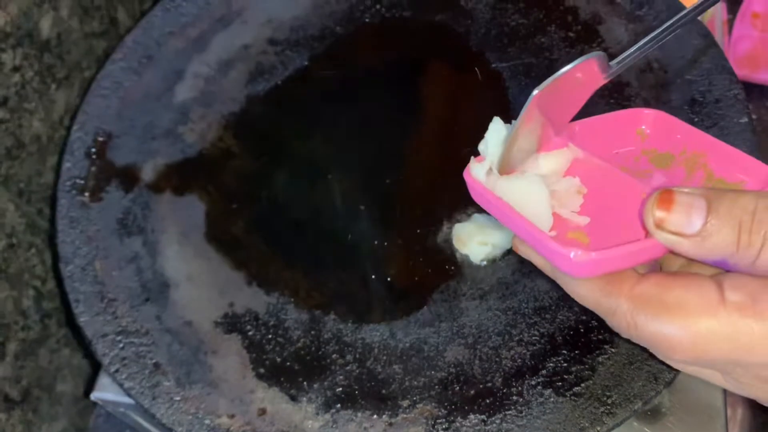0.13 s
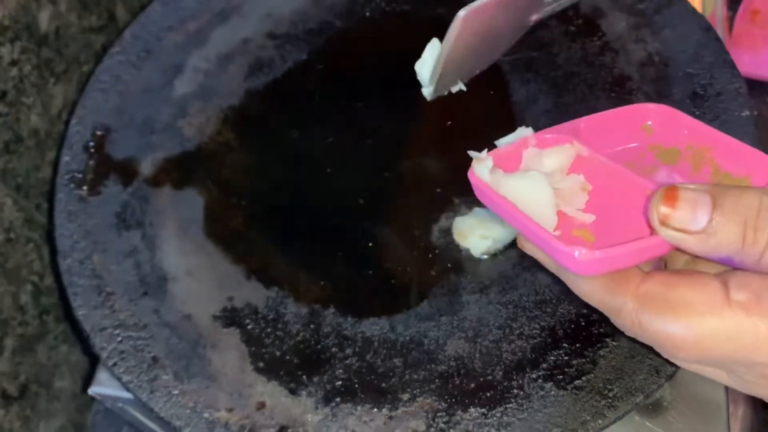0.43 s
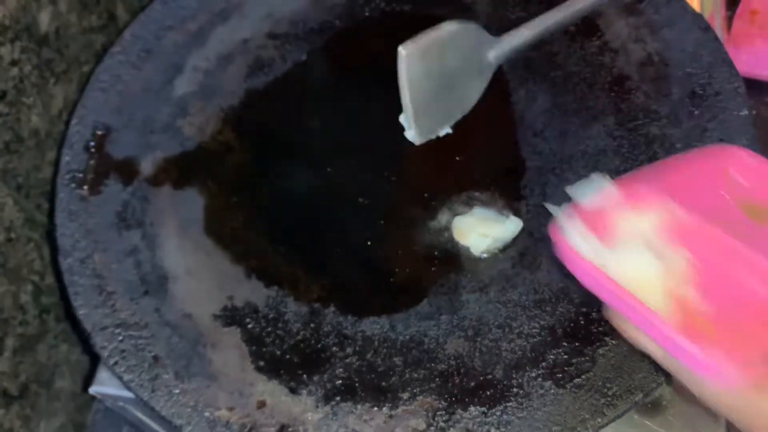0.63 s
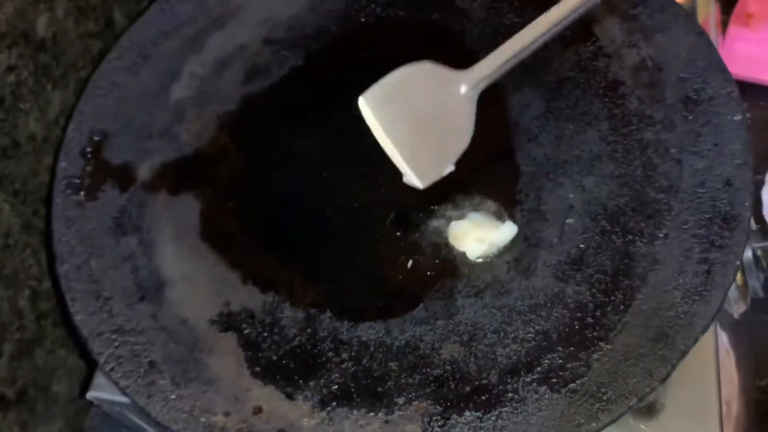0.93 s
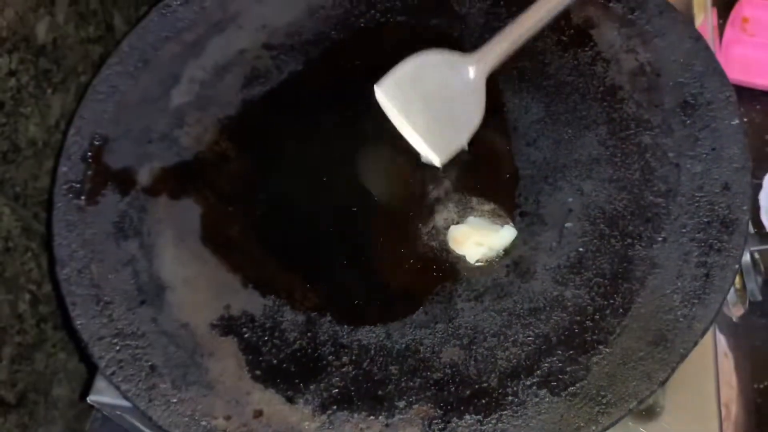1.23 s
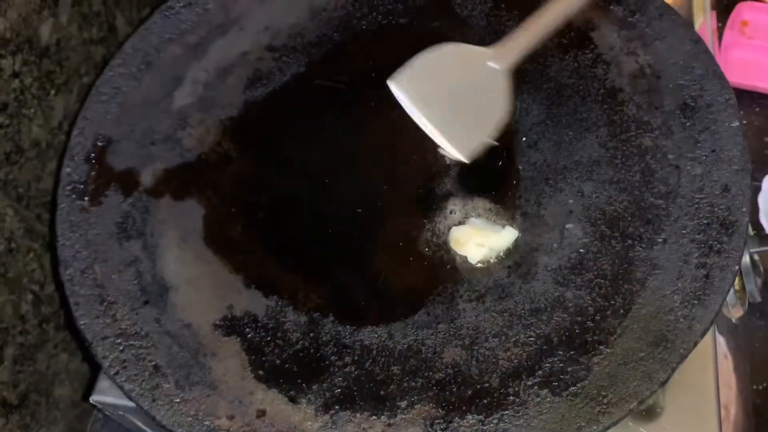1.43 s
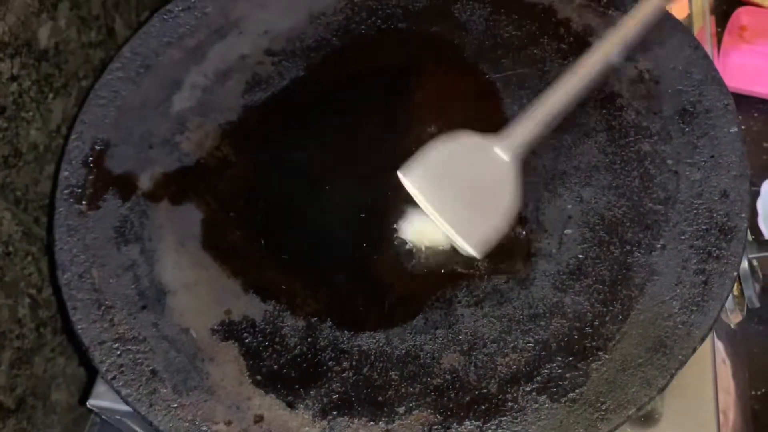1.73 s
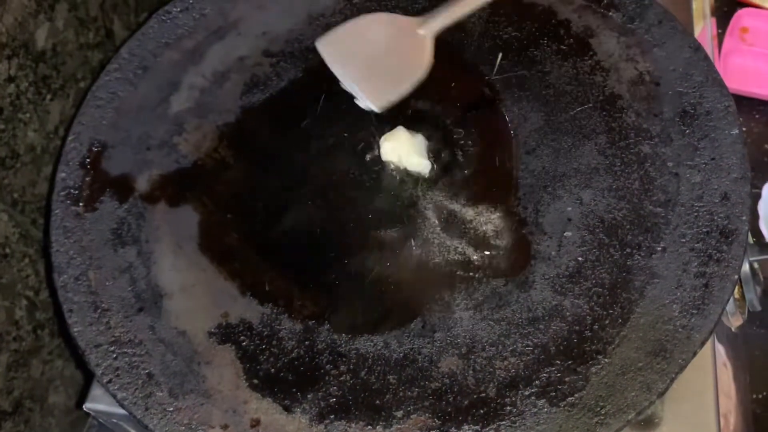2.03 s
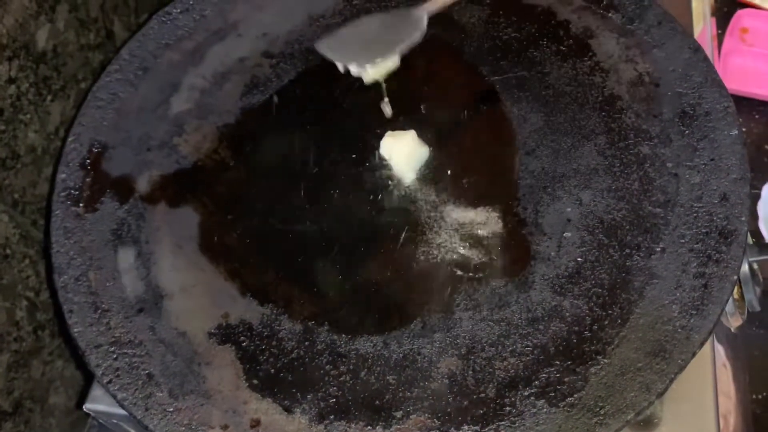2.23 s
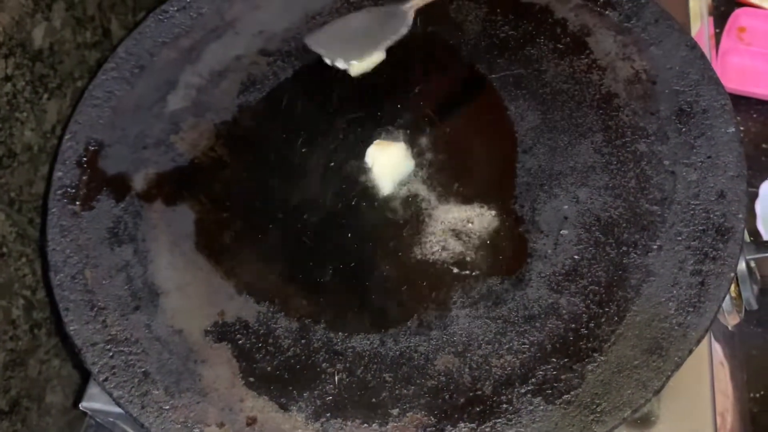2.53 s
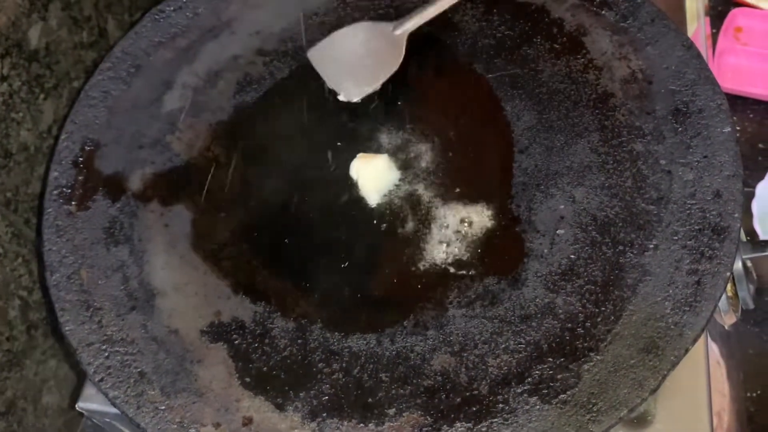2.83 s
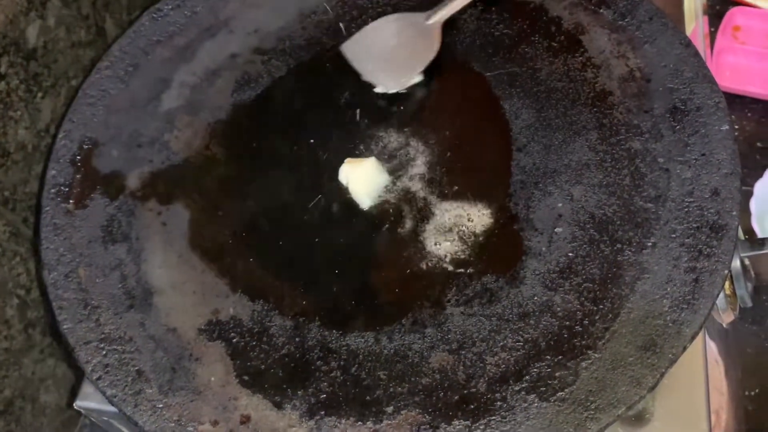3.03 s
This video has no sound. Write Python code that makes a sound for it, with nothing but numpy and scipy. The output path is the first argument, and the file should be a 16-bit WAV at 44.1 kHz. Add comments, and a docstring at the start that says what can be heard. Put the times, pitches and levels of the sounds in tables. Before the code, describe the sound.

Fat sizzles close to a stereo microphone in a kitchen, sparse crackling with bright pops at first, then a spatula knocks and scrapes the iron pan and the fizz grows denser over a faint burner roar.

```python
"""In a kitchen, a lump of fat sizzles in a hot iron pan over a gas flame, close under a two-port microphone.
The sizzle is made of many small bursts, each a short dying note, over a fine hiss of steam.
Large bubbles add short bright pops, trapped water spits with deeper notes, and droplets tick and snap.
A spatula then knocks and rubs the pan: the fat is smeared, the fizz thickens and the iron rings.
Under it lie the low noisy roar of the flame, a wavering hum and a short kitchen echo."""
import sys
import numpy as np
from scipy import signal
from scipy.fft import rfft, irfft
from scipy.io import wavfile
from scipy.ndimage import uniform_filter1d

SR = 44100
rng = np.random.default_rng(int(sys.argv[2]) if len(sys.argv) > 2 else 0)


def output_pcm(signal):
    """Save a mono or channel-first signal as 16-bit PCM at the path in sys.argv[1].

    Samples are clipped to [-1, 1] before scaling.
    """
    pcm = np.clip(np.atleast_2d(signal).T, -1, 1) * 32767
    wavfile.write(sys.argv[1], SR, np.round(pcm).astype(np.int16))


def convert_level_to_amplitude(level_db):
    """Map a level in decibels to its linear amplitude factor."""
    exponent = np.asarray(level_db, float) / 20
    return 10 ** exponent


N = 140238  # length in samples
HZ = np.fft.rfftfreq(N, 1 / SR)
BIGGEST = 2.6  # upper limit of the random draw that sets a bubble's or droplet's size

# how loud the lump of fat sizzles: (time [s], level [dB])
LUMP_LEVEL = [(0.0, -35), (0.12, -35.5), (0.4, -29), (0.75, -36), (1.06, -31), (1.3, -30), (1.7, -33.5),
              (1.82, -30.5), (2.05, -25.5), (2.4, -36.5), (2.94, -33), (3.18, -53)]
# how loud the smeared film of fat sizzles: (time [s], level [dB])
FILM_LEVEL = [(0, -41.5), (1.0, -43.5), (1.5, -36), (1.72, -40.5), (1.9, -32), (2.06, -29), (2.2, -28.5),
              (2.28, -25), (2.38, -26.5), (2.46, -24), (2.6, -25.5), (2.78, -24), (2.85, -27), (3.18, -23)]


def evened(x):
    """Scales a sound to rms 1."""
    return x / np.sqrt(np.mean(x ** 2) + 1e-20)


def read(points, hz):
    """Reads a table between its points, on a log-frequency axis."""
    f, value = np.transpose(points)
    return np.interp(np.log(hz + 1), np.log(f + 1), value)


def curve(points):
    """Turns a level table into a gain for every sample."""
    s, db = np.transpose(points)
    return convert_level_to_amplitude(np.interp(np.arange(N) / SR, s, db))


def coloured(x, tone):
    """Filters x with a tone table, then scales it to rms 1."""
    return evened(irfft(rfft(x) * convert_level_to_amplitude(read(tone, HZ)), N))


def ring(hz, t60, size=1500, glide=0., rise_s=.0001):
    """A dying sine with a soft start; glide raises its pitch early on."""
    t = np.arange(size) / SR
    shape = (1 - np.exp(-t / rise_s)) ** 2 * convert_level_to_amplitude(-60 * t / t60)
    return shape * np.sin(2 * np.pi * hz * t * (1 + glide * np.minimum(t / t60, 1)))


def burst(noise, lo_hz, hi_hz, t60, rise_s):
    """A dying puff of noise, filtered to a band, peak 1."""
    t = np.arange(len(noise)) / SR
    puff = noise * (1 - np.exp(-t / rise_s)) * convert_level_to_amplitude(-60 * t / t60)
    band = signal.butter(2, [lo_hz, hi_hz], "band", fs=SR, output="sos")
    x = signal.sosfilt(band, puff)
    return x / abs(x).max()


def add(mix, s, sound):
    """Mixes a sound in at time s."""
    part = mix[round(s * SR):][:len(sound)]
    part += sound[:len(part)]


def sizzle(level, tone, per_s, spread_db, clump_db, hiss_db, count=32):
    """Clumped bursts of small bubbles of many pitches over a fine steam hiss."""
    # slow random swings make the bursts come in clumps
    swing = uniform_filter1d(uniform_filter1d(rng.standard_normal(N), 500), 300)
    clumps = convert_level_to_amplitude(clump_db * evened(swing))
    size = convert_level_to_amplitude(spread_db * np.minimum(rng.exponential(1, N), BIGGEST))
    size *= rng.choice([-1., 1.], N)
    size *= rng.random(N) < clumps * per_s / SR
    kind = rng.integers(0, count, N)
    fizz = np.zeros(N)
    for k, (a, b) in enumerate(rng.random((count, 2))):
        hz = 1100 + 15000 * (k + a) / count
        # higher notes tend to die sooner
        t60 = (0.51 + b * (46.3 - 0.51)) / (40 * np.sqrt(hz))
        grain = ring(hz, t60, size=600, glide=0.086, rise_s=0.000083)
        fizz += signal.oaconvolve(size * (kind == k), grain / np.linalg.norm(grain))[:N]
    hiss = convert_level_to_amplitude(hiss_db) * np.sqrt(clumps) * rng.standard_normal(N)
    return curve(level) * coloured(evened(fizz) + hiss, tone)


def lump_sizzle():
    """Sparse, uneven bubbling of the lump of fat."""
    # colour of the lump's sizzle: (frequency [Hz], relative level [dB per Hz])
    lump_tone = [(200, -48), (1000, -30), (1500, -25), (2400, -46), (3800, -17.5), (5400, 3.5), (6000, -8),
                 (6600, -4.5), (8000, -4), (11000, -4.5), (14000, -9), (16000, -6.5)]
    return sizzle(LUMP_LEVEL, lump_tone, per_s=334, spread_db=3, clump_db=5.5, hiss_db=-6)


def film_sizzle():
    """Dense, hissing fizz of the smeared film of fat."""
    # colour of the film's sizzle: (frequency [Hz], relative level [dB per Hz])
    film_tone = [(200, -36), (1000, -18.5), (1300, -15), (2000, -15.5), (3500, -1.5), (4800, 7),
                 (5800, 6.5), (7000, 0.5), (11000, -1.5), (16000, -10.5)]
    return sizzle(FILM_LEVEL, film_tone, per_s=1504, spread_db=6, clump_db=4, hiss_db=2)


def pops():
    """A large bubble bursts: ringing cavity, bright crack, lower snap, an echo from the pan wall, then froth."""
    # big bright pops: (time before a short fixed delay [s], relative level [dB], pitch [Hz],
    # level of the lower snap before snap_cut_db [dB])
    pop_list = [(0.0235, -21, 10600, 5), (0.062, -20.5, 7200, 4), (0.1576, -15, 8900, -24),
                (0.258, -16, 6970, -31), (0.3066, -18.5, 6460, -36), (0.351, -13.5, 6100, -40),
                (0.459, -25, 7950, -19), (0.5432, -21, 6560, -39), (0.589, -17, 6070, -40),
                (0.8023, -14, 5460, -34), (0.839, -17.5, 6100, -28), (0.8715, -21, 6640, 6.5),
                (0.9775, -18, 6300, -35), (1.019, -20, 6400, -28), (1.0373, -19, 6300, -18),
                (1.053, -9.5, 6500, -47), (1.1054, -18, 6550, -40), (1.1894, -10.5, 8900, -23),
                (1.2138, -7, 6950, -46), (1.285, -13.5, 6700, -27), (1.3138, -8, 6800, -56),
                (1.373, -13, 5800, -28), (1.402, -14.5, 6540, -6), (1.446, -36, 8050, -22),
                (1.4626, -17, 11600, -29), (1.6448, -13.5, 5800, -24), (1.6573, -6.5, 6050, -49),
                (1.731, -19, 6960, -30), (1.77, -22, 10900, -33), (1.822, -21, 6100, -20),
                (1.8356, -16.5, 11500, -18), (1.878, -25, 10900, -22), (1.894, -26, 8200, -29),
                (2.2741, -10, 6890, 8), (2.3922, -18, 6520, -3), (2.4876, -15, 7200, 7),
                (2.597, -11, 6000, -33), (2.694, -14, 7800, -24), (2.7534, -13.5, 6300, 10),
                (2.914, -27, 7660, -29), (2.9653, -16, 6400, -28), (3.045, -15, 6400, 1),
                (3.1395, -24.5, 6300, 17.5)]
    delay_s, snap_cut_db = 0.0021, -10
    echo_s, echo_db, froth_db, froth_t60 = 0.0014, -19.5, -9.5, 0.11
    out = np.zeros(N)
    for (s, db, hz, snap_db), z in zip(pop_list, rng.standard_normal((len(pop_list), 3, 1600))):
        start = s + delay_s
        cavity = ring(hz, t60=0.0039, size=1600, glide=0.011, rise_s=0.000086)
        crack = burst(z[0], 4500, 14300, t60=0.0012, rise_s=.00005)
        snap = burst(z[1], 1610, 5400, t60=0.0075, rise_s=.0001)
        froth = burst(z[2], 0.8 * hz, min(1.16 * hz, 16000), froth_t60, rise_s=0.00012)
        pop = convert_level_to_amplitude(db) * (2.3 * cavity + 0.7 * crack + convert_level_to_amplitude(snap_db + snap_cut_db) * snap)
        add(out, start, pop + convert_level_to_amplitude(db + froth_db) * froth)
        # the echo delay varies a little from pop to pop
        add(out, start + echo_s * (1 + 0.27 * np.tanh(z[0, 0])), convert_level_to_amplitude(echo_db) * pop)
    return out


def spits():
    """Water trapped under the fat bursts with a deeper note and a crack; the rings near 2 kHz at 1.785 s and
    2.244 s are the spatula clinking as it knocks the pan."""
    # deep spits, plus the spatula's clinks at 1.785 s and 2.244 s: (time before a short fixed delay [s],
    # relative level [dB], pitch [Hz], ring t60 [s])
    spit_list = [(0.162, -31.5, 1680, 0.0057), (0.423, -21, 4570, 0.0084), (0.7188, -15.5, 3820, 0.0054),
                 (0.8695, -18, 4240, 0.0061), (1.189, -12, 4410, 0.018), (1.261, -21.5, 4400, 0.013),
                 (1.3156, -28, 4180, 0.0054), (1.434, -19, 3720, 0.0014), (1.462, -25, 3760, 0.0031),
                 (1.5113, -18, 2950, 0.0028), (1.5358, -15.5, 4360, 0.018), (1.603, -18.5, 4100, 0.0077),
                 (1.7438, -18, 4400, 0.017), (1.7725, -20, 3630, 0.0056), (1.7853, -17, 2130, 0.018),
                 (1.8309, -18, 3650, 0.0076), (1.8331, -8.5, 3870, 0.0049), (1.8419, -17, 4200, 0.018),
                 (1.9205, -18, 2920, 0.0022), (2.0355, -23.5, 1830, 0.0064), (2.0656, -17, 4480, 0.0047),
                 (2.16, -9, 3430, 0.0047), (2.2437, -12, 1995, 0.029), (2.2713, -20, 1990, 0.045),
                 (2.2762, -7.5, 3680, 0.01), (2.2802, -13, 2200, 0.004), (2.2976, -25, 2110, 0.006),
                 (2.3301, -6.5, 2180, 0.003), (2.3374, -20, 1990, 0.0048), (2.4194, -6, 2240, 0.0052),
                 (2.438, -16, 2040, 0.0077), (2.4563, -8, 2330, 0.0043), (2.4657, -11, 2340, 0.0047),
                 (2.5276, -19.5, 2090, 0.0075), (2.644, -9.5, 3840, 0.0092), (2.702, -14, 3780, 0.0046),
                 (2.7488, -16, 3040, 0.0036), (2.868, -21, 3960, 0.014), (2.8866, -18.5, 3620, 0.0094),
                 (2.9393, -17.5, 3740, 0.013), (3.0224, -15.5, 3080, 0.0059), (3.051, -11.5, 3470, 0.0051),
                 (3.1097, -20.5, 1980, 0.0079)]
    delay_s, crack_db = 0.0021, -5
    out = np.zeros(N)
    for (s, db, hz, t60), z in zip(spit_list, rng.standard_normal((len(spit_list), 1500))):
        note = ring(hz, max(t60, .001), glide=0.0087, rise_s=0.000097)
        crack = burst(z, 1100, 7950, t60=0.0021, rise_s=.0001)
        add(out, s + delay_s, convert_level_to_amplitude(db) * (note + convert_level_to_amplitude(crack_db) * crack))
    return out


def snaps():
    """A droplet explodes on bare iron: a needle click and a dry bright crack, with a weaker low edge."""
    # hard snaps: (time [s], relative level [dB])
    snap_list = [(0.023, -4.5), (0.324, -15), (0.425, -7), (0.5425, -9.5), (.59, -16), (.603, -10),
                 (.648, -8), (0.872, 1), (0.884, -11), (1.064, -12), (1.189, -10), (1.2917, -8),
                 (1.4638, -2.5), (1.8967, -6), (2.0052, -12), (2.0144, -1.5), (2.0482, -6), (2.0535, -4),
                 (2.071, 0), (2.083, -10), (2.093, -12), (2.0968, -8), (2.1043, -2), (2.107, -6),
                 (2.6485, -18), (2.788, -6), (2.821, -6), (2.967, 1), (2.984, -4)]
    t60 = 0.0036
    out = np.zeros(N)
    for (s, db), z in zip(snap_list, rng.standard_normal((len(snap_list), 2, 400))):
        needle = z + 9 * (np.arange(400) == 8)  # one tall sample stands out of the noise
        crack = burst(needle[0], 6800, 15300, t60, rise_s=.0001)
        low_edge = burst(needle[1], 810, 6400, t60, rise_s=.0001)
        add(out, s, convert_level_to_amplitude(db) * (crack + 0.063 * low_edge))
    return out


def ticks():
    """Tiny droplets snap over a wide band, more loudly as the sizzle grows."""
    # colour of the ticks: (frequency [Hz], relative level [dB per Hz])
    tick_tone = [(300, -32), (900, -18), (1500, -2.5), (4000, -22), (8000, 11.5), (16000, -1.5)]
    per_s, spread_db, under_sizzle_db = 90, -0.5, -10
    size = convert_level_to_amplitude(spread_db * np.minimum(rng.exponential(1, N), BIGGEST))
    size *= rng.random(N) < per_s / SR
    shapes = np.exp(-np.arange(200) / 22) * rng.standard_normal((4, 200))
    kind = rng.integers(0, len(shapes), N)
    train = sum(signal.oaconvolve(size * (kind == k), one)[:N] for k, one in enumerate(shapes))
    loudness = uniform_filter1d(curve(LUMP_LEVEL) + curve(FILM_LEVEL), 8000)
    return convert_level_to_amplitude(under_sizzle_db) * loudness * coloured(train, tick_tone)


def scrape():
    """The spatula rubs the iron: very dense small bursts, made the same way as the sizzle."""
    # how loud the spatula rubs: (time [s], level [dB])
    scrape_level = [(1.76, -93), (1.785, -42), (1.85, -58), (1.9, -75), (2.235, -55), (2.25, -36),
                    (2.3, -36.5), (2.345, -38), (2.37, -39), (2.415, -69), (2.43, -30), (2.48, -46),
                    (2.55, -44), (2.65, -75)]
    # colour of the rubbing: (frequency [Hz], relative level [dB per Hz])
    scrape_tone = [(200, -34), (600, -4), (1100, -11), (2000, -6.5), (3200, -5.5), (4500, -10), (7000, -55),
                   (16000, -50)]
    return sizzle(scrape_level, scrape_tone, per_s=5006, spread_db=2, clump_db=4.5, hiss_db=-8)


def thuds():
    """The spatula knocks the pan: its low modes ring over a soft puff, and a short push drives the iron."""
    # knocks: (time [s], relative level [dB], centre [Hz], t60 [s], push into the iron [dB])
    knock_list = [(1.098, -51.5, 700, 0.094, -30), (1.785, -52, 445, 0.26, -34),
                  (2.246, -35, 448, 0.17, -20), (2.276, -40, 216, 0.36, -13), (2.42, -60, 755, 0.055, -10),
                  (2.457, -63, 700, 0.19, -1.5), (2.754, -70, 700, .05, -13), (3.112, -49, 700, 0.046, -6)]
    # low modes of the spatula: (frequency [Hz], relative level [dB])
    blade_modes = [(190, -0.5), (350, 3.5), (450, 2), (590, 2.5), (890, 18)]
    width, rise_s, puff_db = .5, 0.0027, -6  # width is a share of the centre frequency
    out, push = np.zeros((2, N))
    for (s, db, hz, t60, push_db), z in zip(knock_list, rng.standard_normal((len(knock_list), 12000))):
        blade = np.zeros(12000)
        for f, mode_db in blade_modes:
            nearness = np.exp(-(np.log(f / hz) / width) ** 2)  # modes near the centre are favoured
            blade += convert_level_to_amplitude(mode_db) * nearness * ring(f, t60, size=12000, rise_s=rise_s)
        puff = burst(z, hz * (1 - width), hz * (1 + width), t60, rise_s)
        add(out, s, convert_level_to_amplitude(db) * (blade / abs(blade).max() + convert_level_to_amplitude(puff_db) * puff))
        add(push, s, convert_level_to_amplitude(push_db) * np.hanning(9))
    return out, push


def iron(blows):
    """The pan's modes, dying sines set ringing by what happens on it."""
    # modes of the iron pan: (frequency [Hz], relative level [dB], t60 [s])
    pan_modes = [(1232, -10, .4), (1890, -11, .12), (1920, -5, .15), (2042, 0, .33), (2256, -8, .35),
                 (2450, -10, .2), (2925, -9, .2), (3665, -10, .12), (4042, -15, .25), (5755, -13, .2)]
    modes = sum(convert_level_to_amplitude(db) * ring(hz, t60, size=SR // 2) for hz, db, t60 in pan_modes)
    return convert_level_to_amplitude(-9.5) * signal.oaconvolve(blows, modes / np.linalg.norm(modes))[:N]


def ports(x):
    """One source heard by two ports; the right one lags in the treble."""
    lag_s, from_hz, knee_hz = 0.0002422, 2835, 583
    # zero in the bass, then bending smoothly into a straight rise
    above = knee_hz * np.logaddexp(0, (HZ - from_hz) / knee_hz)
    turn = np.exp(1j * np.pi * lag_s * above)
    return irfft(rfft(x) * np.array([turn, 1 / turn]), N)


def kitchen(x):
    """A short echo tail of dying noise, different at each port, fullest around 1 to 2.5 kHz, dull in the treble."""
    # colour of the tail, added to the overall level: (frequency [Hz], level [dB])
    kitchen_tone = [(200, 3), (1000, 10), (2500, 8.5), (5000, -3), (16000, -25)]
    level_db, t60 = -17, 0.079
    t = np.arange(SR // 3) / SR
    tail = rng.standard_normal((2, len(t))) * convert_level_to_amplitude(-60 * t / t60) * (t > .004)
    wet = signal.fftconvolve(x[None], tail / np.linalg.norm(tail[0]), axes=1)[:, :N]
    return irfft(rfft(wet) * convert_level_to_amplitude(level_db + read(kitchen_tone, HZ)), N)


def flame():
    """Low noisy roar of the burner with a wavering hum, the lows much alike at both ports."""
    # colour of flame and room: (frequency [Hz], relative level [dB per Hz])
    flame_tone = [(18, 5), (26, 6), (31, -35), (42, -10), (50, 5), (100, 3), (190, -5), (260, -10),
                  (420, -14), (700, -10.5), (1000, -19), (1500, -9), (2500, -29), (5000, -64)]
    # how loud the hum is: (time [s], level [dB])
    hum_level = [(0.0, -79), (0.51, -63), (1.9, -52.5), (2.2, -57.5), (2.7, -57.5), (3.18, -56)]
    # likeness of the two ports: (frequency [Hz], likeness [0 to 1])
    likeness = [(80, 1.0), (200, 0.91), (600, 0.17), (1200, 0.8)]
    flame_db, grows_db_per_s = -56, 0.82
    hum_hz, hum_width_hz = 75.9, 4.3
    a, b, c = rfft(rng.standard_normal((3, N)))
    same = np.clip(read(likeness, HZ), 0, 1)
    right = same * a + np.sqrt(1 - same ** 2) * b
    roar = irfft(np.array([a, right]) * convert_level_to_amplitude(read(flame_tone, HZ)), N)
    # a narrow band of noise wavers like an unsteady note
    hum = irfft(c / (1 + ((HZ - hum_hz) / hum_width_hz) ** 2), N)
    roar_gain = convert_level_to_amplitude(flame_db + grows_db_per_s * np.arange(N) / SR)
    return roar_gain * evened(roar) + curve(hum_level) * evened(hum)


def scene():
    """Fat in the pan, the spatula, the iron, the kitchen and the flame."""
    deep = spits()
    film = film_sizzle()
    rub = scrape()
    knock, push = thuds()
    fat = lump_sizzle() + film + pops() + deep + ticks() + snaps()
    ringing = iron(0.036 * deep + 0.94 * film + 1.15 * rub + push)
    pan = fat + rub + knock + ringing
    return ports(pan) + kitchen(pan) + flame()


def band_limit(x):
    """A steep low-pass at the top of the band."""
    return signal.sosfilt(signal.butter(12, 17080, fs=SR, output="sos"), x)


def record(dry):
    """A steep low-pass filter at 15.8 kHz takes off the top of the treble."""
    edge = signal.firwin(511, 15800, window=("kaiser", 7), fs=SR)
    mix = signal.oaconvolve(dry, edge[None], "same")
    return band_limit(mix)


dry = scene()
out = record(dry)
output_pcm(out)
```